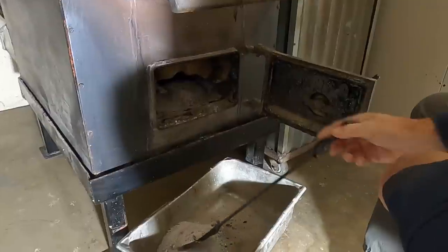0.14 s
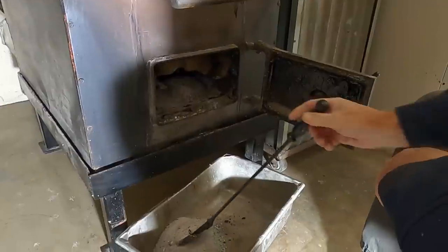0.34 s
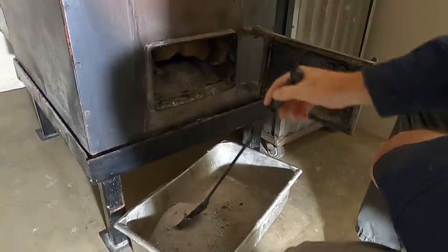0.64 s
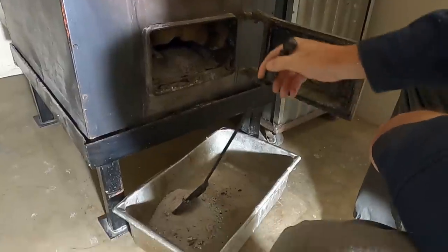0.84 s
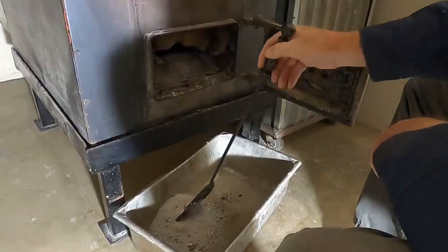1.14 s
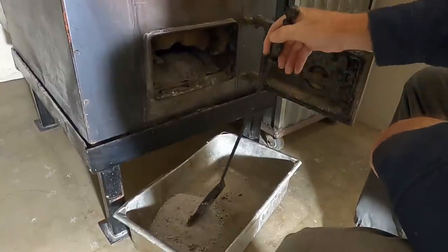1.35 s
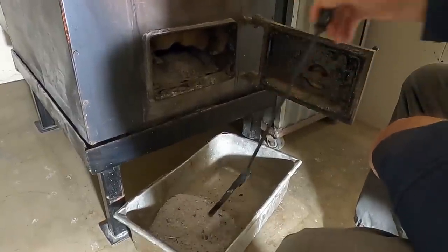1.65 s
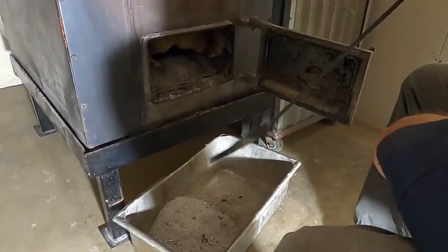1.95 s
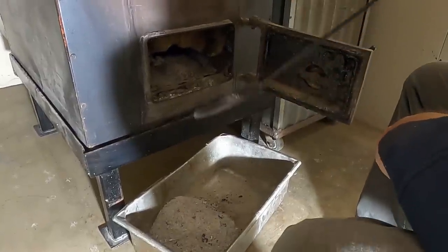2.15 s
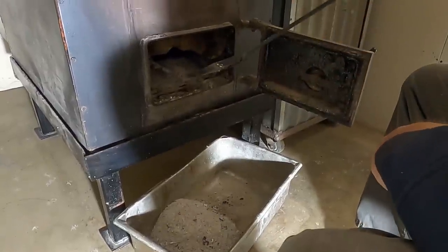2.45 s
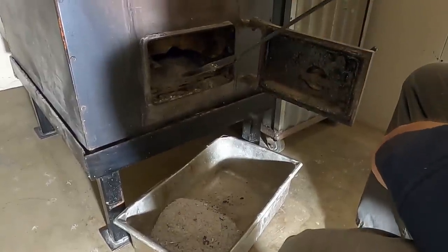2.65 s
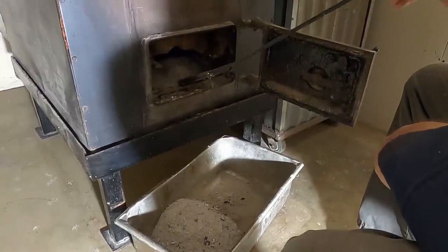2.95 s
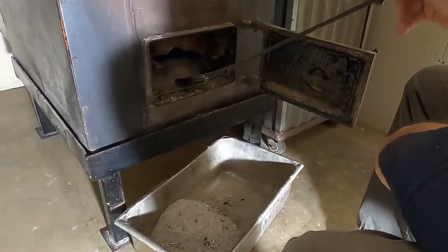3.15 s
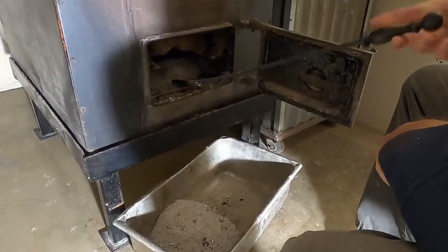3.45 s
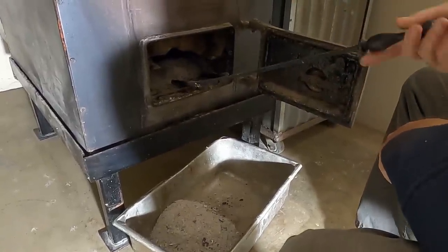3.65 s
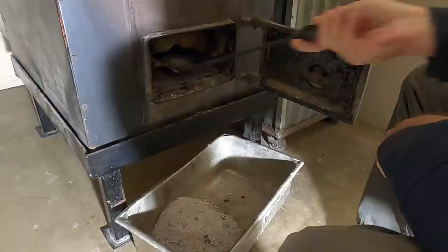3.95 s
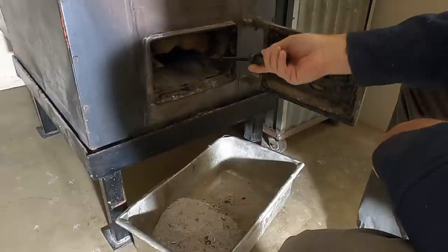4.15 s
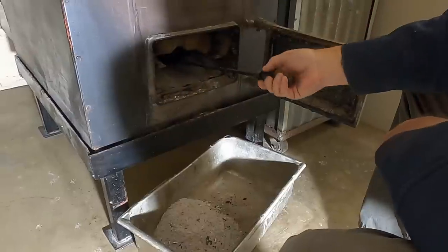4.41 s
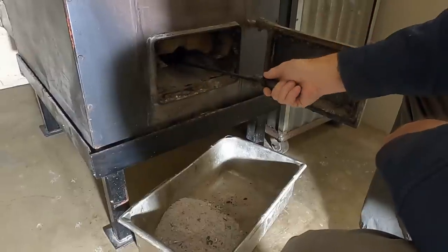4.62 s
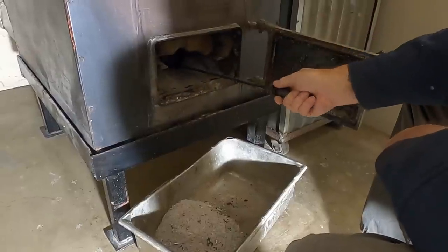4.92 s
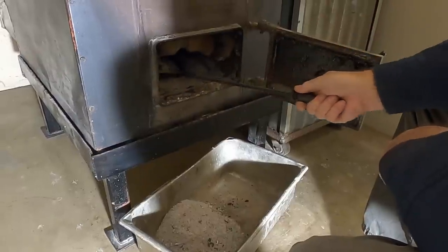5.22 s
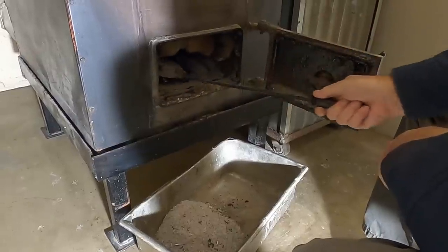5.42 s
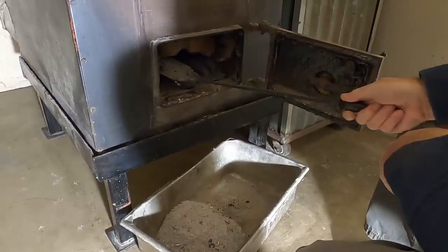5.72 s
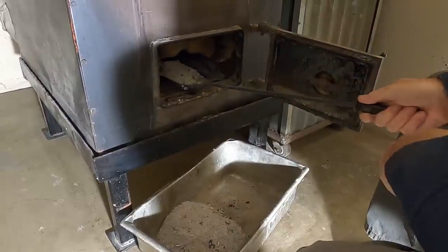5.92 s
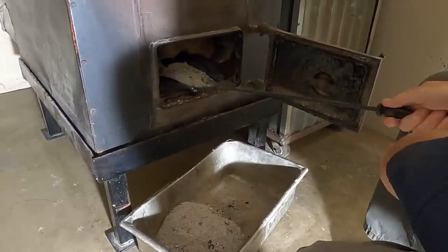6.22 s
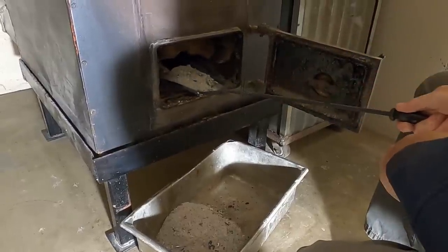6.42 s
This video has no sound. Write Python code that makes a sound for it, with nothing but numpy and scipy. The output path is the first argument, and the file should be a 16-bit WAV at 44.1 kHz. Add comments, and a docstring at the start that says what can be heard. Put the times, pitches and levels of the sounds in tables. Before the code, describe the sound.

Ash hisses softly off a small steel shovel, then the blade clanks on a stove door and scrapes gritty metal inside over a steady low fan hum.

```python
"""A small steel shovel lets its ash slide off into a metal tub, knocks against the ash door of a wood stove
and is pushed across the gritty steel floor, which rings under it. Loaded, it is drawn out with a soft rustle.
Scrape, ash, cinders, cloth and fan air are shaped grains or noise; squeaks, ringing steel and the fan's hum
are wavering sines. The fan hums all the while in the hard-walled room."""
import sys
import numpy as np
from scipy import signal
from scipy.fft import rfft, irfft, next_fast_len
from scipy.io import wavfile

SR = 44100
rng = np.random.default_rng(int(sys.argv[2]) if len(sys.argv) > 2 else 0)


def store_pcm(level_fs):
    """Save levels as 16-bit WAV."""
    pcm = np.round(np.clip(level_fs, -1, 1) * 32767).astype(np.int16)
    wavfile.write(sys.argv[1], SR, np.atleast_2d(pcm).T)


N = 289781
TIME = np.arange(N) / SR

# strokes of the blade over the stove floor: start t/s, speeding up/s, steady/s, slowing down/s,
# relative level/dB, treble control and low-ring control (both scaled to dB in scrape), chatter/0-1
FLOOR_STROKES = [(2.997, 0.021, 0.052, 0.032, -41, -24, -5, 1),
                 (3.06, 0.042, 0.2, 0.094, -40.5, -14, 3.5, 0.06),
                 (3.32, 0.063, 0.78, .1, -64.5, 10.5, 1, 0), (3.44, 0.063, 0.05, 0.092, -61, 6, -10, 0.1),
                 (3.802, 0.25, 0.093, 0.18, -21, -12.5, -5.5, 0.93),
                 (4.275, 0.042, 0.0085, 0.14, -42, -16, -10, 0.8),
                 (4.46, 0.058, 0.0094, 0.19, -63.5, -1, -4, 0)]
# colour of blade on grit: f/Hz, relative level/dB
GRIT_SPECTRUM = [(70, -39.5), (270, 0.5), (450, -5), (560, -12), (680, -9), (830, -14), (1000, -3.5),
                 (1700, -3), (3900, -5), (5600, -9), (7500, -11.5), (8700, -17), (13000, -25),
                 (15700, -36.5)]


def from_db(db):
    """Decibels to an amplitude factor."""
    return 10 ** (np.asarray(db) / 20)


def rms_one(x):
    """Scale to rms 1."""
    return x / np.sqrt(np.mean(x ** 2) + 1e-20)


def unit_energy(x):
    """Scale so that the channels have energy 1 on average."""
    return x / np.sqrt(np.mean(np.sum(x ** 2, axis=-1)))


def at_hz(points, size):
    """A table over log frequency, read at the bins of a transform."""
    hz, value = np.transpose(points)
    bins = np.fft.rfftfreq(size, 1 / SR)
    return np.interp(np.log(bins + 1e-3), np.log(hz), value)


def cut(x, hz, kind, order=2):
    """Butterworth filter."""
    sos = signal.butter(order, np.minimum(hz, .45 * SR), kind, fs=SR, output="sos")
    return signal.sosfilt(sos, x)


def colour(x, spectrum):
    """Causal (minimum-phase) filter with the given spectrum."""
    size = next_fast_len(x.shape[-1] + 4096, True)
    cepstrum = irfft(np.log(from_db(at_hz(spectrum, size))), size)
    # folding the cepstrum onto positive time makes the phase minimal
    cepstrum[1:size // 2] *= 2
    cepstrum[size // 2 + 1:] = 0
    response = np.exp(rfft(cepstrum))
    return irfft(rfft(x, size) * response, size)[..., :x.shape[-1]]


def stereo_noise(size):
    """Noise whose left-right likeness depends on frequency: strong in the bass, weak in the mid treble."""
    # f/Hz, left-right likeness/0-1
    likeness = [(30, 0.85), (200, 1), (600, 0.92), (1200, 0.72), (2500, 0.26), (5000, 0.21), (14000, 0.72)]
    padded = next_fast_len(size, True)
    mid, side = rfft(rng.standard_normal((2, padded)))
    alike = np.clip(at_hz(likeness, padded), 0, .999)
    both = np.sqrt(1 + alike) * mid + np.sqrt(1 - alike) * side * [[1], [-1]]
    return rms_one(irfft(both, padded)[:, :size])


def drift(rate):
    """Random curve of rms 1: straight lines between chance values, rate of them per second."""
    knots = rng.standard_normal(4000)
    return rms_one(np.interp(TIME * rate, np.arange(len(knots)), knots))


def partial(hz, waver_hz, rate):
    """A sine of height 1 whose pitch wavers at random."""
    pitch = hz + waver_hz * drift(rate=rate)
    return np.sin(2 * np.pi * (np.cumsum(pitch) / SR + rng.random()))


def resonance(x, hz, width_hz):
    """Two-pole band-pass with a gain of about 1 on top."""
    r = np.exp(-np.pi * width_hz / SR)
    feedback = [1, -2 * r * np.cos(2 * np.pi * hz / SR), r * r]
    return signal.lfilter([(1 - r * r) / 2, 0, (r * r - 1) / 2], feedback, x + 1e-18)


def steel(x, modes, width_at_1khz, lift_db):
    """A steel part lifts the sound at each of its modes; high modes are wider."""
    lifted = x
    for hz, db in modes:
        width_hz = width_at_1khz * np.sqrt(hz / 1000)
        lifted = lifted + (from_db(db + lift_db) - 1) * resonance(x, hz, width_hz)
    return lifted


def grains(per_s, spread_db):
    """Random clicks of unequal size and either sign, rms 1."""
    sizes = from_db(spread_db * np.minimum(rng.exponential(1, N), 5)) * rng.choice([-1, 1], N)
    return rms_one(sizes * (rng.random(N) < per_s / SR))


def room(x, wet_db, t60, above_hz):
    """Direct sound and a dense half-second tail, thin in the bass; the treble dies first."""
    t = TIME[:SR // 2]
    noise = cut(stereo_noise(len(t)), above_hz, "high", order=1)
    dull = cut(noise, 4600, "low", order=1)
    bright = noise - dull
    tail = dull * from_db(-60 * t / t60) + bright * from_db(-60 * t / (0.27 * t60))
    tail = tail * (t > .002)
    wet = signal.fftconvolve(np.atleast_2d(x), unit_energy(tail), axes=1)[:, :N]
    return (x + from_db(wet_db) * wet) / np.sqrt(1 + from_db(2 * wet_db))


def fan():
    """A wavering blade tone over rushing air that resonates in the housing."""
    # rushing air, then its hiss: f/Hz, relative level/dB
    air_spectrum = [(25, -49.5), (58, -26.5), (85, -28.5), (110, -20), (135, -23), (175, -13), (235, -4),
                    (290, -10.5), (450, -23.5), (640, -27), (900, -33.5), (1130, -29.5), (1500, -37.5),
                    (2400, -48.5)]
    hiss_spectrum = [(1500, -2.5), (2600, -12.5), (4800, 3), (7000, -2), (9000, -16), (15000, -23)]
    # resonances of the housing: f/Hz, width/Hz, rms level/dB
    housing_modes = [(204.45, 8.2, -46.5), (224.2, 19, -50.5), (266.4, 10.2, -52), (292.5, 7.9, -64),
                     (348.2, 22, -57.5), (453.3, 11.8, -59.5)]
    hum_hz, hum_db, sag_db_per_s = 195.7, -39.5, 0.4   # the tone sinks slowly

    level = from_db(hum_db - sag_db_per_s * TIME)
    pitch = hum_hz + 1.8 * drift(rate=12)
    flutter = from_db(2 * drift(rate=14) + 1.6 * drift(rate=28))
    tone = level * rms_one(flutter * np.sin(2 * np.pi * np.cumsum(pitch) / SR))
    air = from_db(-45.5) * rms_one(cut(colour(stereo_noise(N), air_spectrum), 2637, "low"))
    flow = stereo_noise(N)
    housing = 0
    for hz, width, db in housing_modes:
        mode = resonance(resonance(flow, hz, 1.34 * width), hz, 4 * width)
        housing = housing + from_db(db) * rms_one(mode)
    hiss = from_db(-79) * rms_one(colour(stereo_noise(N), hiss_spectrum))
    return tone + air + housing + hiss


def sleeve():
    """Cloth fibres rub faintly; each movement of the arm swells and fades like a bell curve."""
    # arm movements: middle t/s, length/s, relative level/dB
    movements = [(2.04, 0.17, -74), (4.827, 0.12, -73), (5.427, 0.49, -70.5), (5.74, 0.13, -74.5),
                 (6.243, 1, -75)]
    # rubbing cloth: f/Hz, relative level/dB
    cloth_spectrum = [(1290, -25.5), (2200, -4), (4500, -6), (7640, -12), (14000, -34)]
    power = sum(from_db(2 * db) * np.exp(-(2 * (TIME - s) / length) ** 2) for s, length, db in movements)
    rubbing = stereo_noise(N) * from_db(1.1 * drift(rate=160))
    return from_db(0.5) * np.sqrt(power) * rms_one(colour(rubbing, cloth_spectrum))


def cinders():
    """A cinder gives a bright tick as it cracks or drops; a heavy one also thuds on the steel under it."""
    # t/s, relative level of the bright tick/dB, relative level of the dull thud/dB
    drops = [(.632, -65, -62), (1.119, -54, -50), (3.84, -43, -39), (4.3894, -45.5, -56), (4.414, -54, -45),
             (4.529, -53.5, -55), (4.8562, -70, -44), (5.9894, -56, -74), (6.317, -58, -71)]
    out, t = np.zeros(N), TIME[:SR // 8]
    for s, tick_db, thud_db in drops:
        crack = rng.standard_normal(len(t))
        tick = cut(crack, [4500, 9500], "band") * np.exp(-t / 0.003)
        thud = cut(cut(crack, [560, 1700], "band"), 1900, "low") * np.exp(-t / 0.015)
        start = round(s * SR)
        out[start:start + len(t)] += from_db(tick_db) * tick + from_db(thud_db) * thud
    return from_db(4.5) * room(out, wet_db=-2.5, t60=0.209, above_hz=890)


def ash_flow():
    """Each slide builds up and runs out exponentially; overlapping slides add in power."""
    # slides of ash off the blade: peak t/s, relative level/dB, build-up/s, run-out/s
    ash_slides = [(0.017, -62.5, 0.096, 0.043), (0.2, -67.5, 0.091, 0.065), (0.495, -54, 0.027, 0.023),
                  (0.51, -55.5, 0.1, 0.049), (0.72, -71.5, 0.42, 0.21), (0.9, -65.5, 0.05, 0.36),
                  (1.14, -60, 0.089, 0.074), (1.475, -58.5, 0.21, 0.066), (1.54, -60, 0.049, 0.089)]
    power = 1e-18
    for s, db, build, run_out in ash_slides:
        away = np.maximum((s - TIME) / build, (TIME - s) / run_out)
        power = power + (from_db(db) * np.exp(-away)) ** 2
    return np.sqrt(power)


def blade_ring(drive):
    """Sliding ash feeds the modes of the freely held blade, which ring on after it has gone."""
    # f/Hz, relative level/dB
    modes = [(2516, -2), (3073, -6), (3520, -4), (4027, -1), (4310, -2), (4403, -1), (4920, -4),
             (5150, -3.5), (5420, -1), (5706, -7), (5997, -6), (6340, -2), (7332, -9)]
    t60_at_4khz = .26   # seconds; lower modes last longer
    out = 0
    for hz, db in modes:
        keep = from_db(-120 * (hz / 4000) ** 2 / (t60_at_4khz * SR))   # energy kept per sample
        energy = signal.lfilter([1 - keep], [1, -keep], drive ** 2 + 1e-18)
        shimmer = from_db(3.5 * drift(rate=30)) * partial(hz, waver_hz=7, rate=60)
        out = out + from_db(db) * np.sqrt(energy / energy.max()) * rms_one(shimmer)
    return from_db(-67.5) * room(out, wet_db=-5, t60=0.17, above_hz=1600)


def pour():
    """Fine ash hisses along the ringing blade; lumps land softly in the tub."""
    # fine ash: f/Hz, relative level/dB
    ash_spectrum = [(1180, -26.5), (2000, -17.5), (2110, -4), (5280, -0.5), (7800, -7.5), (12700, -16.5),
                    (15600, -30)]
    level = ash_flow()
    # the lumps go first, the fine ash last: level against the fine ash, falling at 14 dB/s from 0.34 s
    lumps_db = 5.5 - 14 * np.maximum(TIME - 0.34, 0)
    fine = rms_one(colour(grains(per_s=8200, spread_db=2.0), ash_spectrum))
    lumps = rms_one(cut(grains(per_s=900, spread_db=2.2), [880, 3200], "band"))
    # the emptier the blade, the more freely it rings, until it is lifted away
    empty = np.interp(TIME, [1.25, 1.54, 1.62], [.05, 1, 0])
    ash = room(level * (fine + from_db(lumps_db) * lumps), wet_db=-5.5, t60=0.25, above_hz=410)
    return ash + blade_ring(level * empty)


def knocks():
    """Each knock is a rough clank and adds energy to the shovel's modes, choked when the blade is pressed down."""
    # blade on steel: t/s, relative peak level/dB, pressure on the blade/0-1, brightness/dB per octave
    blows = [(1.119, -45, .6, 1), (2.9123, -36, 0, 2), (2.9163, -29.3, 0, 1), (2.9404, -29.5, 0, -3),
             (3.0165, -32.5, 0, 3), (3.0374, -31.5, 0, -1), (3.1076, -32, .8, -2), (3.16, -34, .9, -2),
             (3.2637, -38, .9, -2), (3.313, -37, .9, 0), (3.9844, -23, .9, -1), (4.0684, -18.5, .5, 0),
             (4.3315, -23.5, 1, -1)]
    # modes of the struck shovel and door frame: f/Hz, relative level/dB, t60/s
    modes = [(1628, 1.5, .14), (1911, -12, .22), (2385, -12, .35), (2485, -10, .35), (3330, -9.5, .4),
             (3543, -11, .35), (3866, -4, .35), (4021, -1.5, .4), (4380, -12, .22), (4530, -10, .16),
             (4890, -9, .2), (4982, -4.5, .18), (5130, -8.5, .2), (5735, -7.5, .17), (7080, -16, .12),
             (7680, -13, .12)]
    # a knock rings less under full pressure, and dies faster while pressed or once the next stroke begins
    pressed_loss_db, choke_db_per_s = 10, 260

    t, (hz, db, t60) = TIME[:SR // 2], np.transpose(modes)[:, :, None]
    clanks, energy = np.zeros(N), np.zeros((len(hz), N))
    for s, peak_db, pressure, bright_db in blows:
        attack = np.minimum(t / 0.00085, 1)
        blow = from_db(peak_db) * np.exp(-np.clip(pressure, 0, 1) * t / 0.012) * attack
        next_stroke = min(start for start, *_ in FLOOR_STROKES if start > s)
        choked_s = np.maximum(s + t - next_stroke, pressure * t)
        choke_db = pressed_loss_db * pressure + choke_db_per_s * choked_s
        span = slice(round(s * SR), round(s * SR) + len(t))
        mode_db = db + bright_db * np.log2(hz / 4000) - 60 * t / t60 - choke_db
        energy[:, span] += (blow * from_db(mode_db)) ** 2
        tilted = [(f, level + bright_db * np.log2(f)) for f, level in GRIT_SPECTRUM]
        clank = rms_one(colour(rng.standard_normal(len(t)), tilted))
        clanks[span] += blow * clank * np.exp(-t / 0.021)
    ring = sum(np.sqrt(e) * partial(f, waver_hz=8, rate=150) for f, e in zip(hz, energy))
    ring = room(ring, wet_db=-10, t60=0.21, above_hz=5000)
    return from_db(-14.0) * ring + from_db(-10.5) * room(clanks, wet_db=-3.0, t60=0.21, above_hz=5000)


def squeaks():
    """Where the edge catches, the steel sings roughly for a moment, at a pitch set by the point of contact."""
    # middle t/s, relative level/dB, f/Hz, length/s
    edge_squeaks = [(1.4, -65, 5200, .06), (3.056, -56, 7700, .045), (3.115, -44, 1238, .03),
                    (3.118, -47, 2380, .04), (3.21, -49, 1700, .03), (3.55, -65, 4080, .06),
                    (3.908, -40, 1680, .05), (3.975, -31, 1620, .04), (3.994, -31, 3250, .025),
                    (4.175, -28, 2945, .03), (4.345, -42, 2770, .035), (4.34, -43, 3300, .03)]
    out = 0
    for s, db, hz, length in edge_squeaks:
        swell = from_db(db) * np.exp(-2 * ((TIME - s) / length) ** 2)
        waver_hz = .028 * np.sqrt(hz * 4000)   # low squeaks jitter by a larger share of their pitch
        out = out + swell * rms_one(partial(hz, waver_hz=waver_hz, rate=700))
    return from_db(-1) * room(out, wet_db=-5, t60=0.202, above_hz=4800)


def catches(count=30):
    """Coarse grains snag under the edge; each rings briefly at a pitch set by its point of contact. Rms 1."""
    snags, dealt = grains(per_s=300, spread_db=0.5), rng.integers(0, count, N)
    pitches = np.geomspace(1500, 8000, count)
    return rms_one(sum(resonance(snags * (dealt == k), hz, width_hz=50) for k, hz in enumerate(pitches)))


def stroke_controls():
    """Loudness follows the blade's speed; along each stroke force sags, grit brightens and chatter sets in."""
    speed_power = 2.15   # loudness rises with this power of the blade's speed
    sag_db_per_s = 36   # a stroke loses force as ash heaps up before the blade
    brighten_per_s = 15   # treble control: the grit is ground finer along a stroke
    unload_per_s = 3   # low-ring control: the low ring of the plate fades along a stroke

    power, tone = 1e-18, 0
    for start, rise, steady, fall, db, treble, low, chatter in FLOOR_STROKES:
        length = rise + steady + fall
        age = np.clip(TIME - start, 0, length)
        speed = np.sin(np.pi / 2 * np.clip(np.minimum(age / rise, (length - age) / fall), 0, 1))
        force = from_db(db - sag_db_per_s * np.maximum(age - rise, 0))
        own = (speed ** speed_power * force) ** 2
        power = power + own
        # where strokes overlap, the louder one sets the tone
        eased = np.clip(chatter, 0, 1) * age / length
        starting = np.maximum(1 - age / rise, 0)
        tone = tone + own * np.array([treble + brighten_per_s * age, low - unload_per_s * age,
                                      eased, starting])
    return np.sqrt(power), *(tone / power)


def scrape():
    """The blade crushes grit in uneven slips; the grains set the stove floor ringing."""
    # modes of the stove floor: f/Hz, lift/dB (before the extra lift that all share)
    floor_modes = [(662, 7), (928, 6), (1033, 4.0), (1135, 6.4), (1251, 5.4), (1380, 3.9), (1598, 5.2),
                   (1703, 4.8), (1846, 3.2), (1919, 3.1), (2231, 3.0), (2395, 3.7), (2635, 2.8),
                   (2772, 5.4), (2855, 3.5), (3259, 3.0), (3986, 5.4), (4543, 2), (4990, 3), (6325, 4.0),
                   (7345, 4.4)]
    # chatter of the lightly held blade: f/Hz, width/Hz, relative level/dB
    chatter_modes = [(2660, 240, -2), (3750, 480, 7)]

    level, treble, low, eased, starting = stroke_controls()
    slips = from_db(1.4 * drift(rate=130))
    # grains break all across the width of the blade
    centre, edges = grains(per_s=8000, spread_db=3.0), grains(per_s=9000, spread_db=2.5)
    crush = rms_one((centre + from_db(-14.5) * edges * [[1], [-1]]) * slips)
    fine = rms_one(colour(crush, GRIT_SPECTRUM))
    coarse = rms_one(colour(catches(), GRIT_SPECTRUM))
    grit = rms_one(fine + from_db(-6) * coarse)
    # pressing hard drives the low ring of the plate; eased off, the blade chatters instead
    push = grit + cut(grit, 990, "low", order=1) * (from_db(0.68 * (low + 7.0)) - 1)
    push = push + eased * sum(from_db(db) * resonance(grit, hz, width) for hz, width, db in chatter_modes)
    push = cut(push, 6600, "low") - cut(grit, 8940, "high") * from_db(0.3 * (treble + 17.5))
    # the treble is weaker while the blade is still gathering speed
    push = push + cut(push, 3050, "high", order=1) * (from_db(-2.5 * starting) - 1)
    plate = steel(push * level, floor_modes, width_at_1khz=14, lift_db=3.6)
    # the heavy stove body takes up the lows late and booms on
    boom = room(cut(plate, [215, 540], "band"), wet_db=16, t60=.7, above_hz=10)
    return from_db(-4.5) * room(plate, wet_db=-10.0, t60=0.27, above_hz=4150) + from_db(-13) * boom


def scene():
    """The stove sounds lean slightly left in the mids and right in the top treble; the rest joins them."""
    # f/Hz, left minus right/dB
    stove_side = [(1000, 0.5), (2500, 1), (5000, -0.5), (9000, -1), (13000, -5)]
    left, right = scrape() + squeaks() + knocks() + cinders()
    stove = np.array([colour(left, [(hz, db / 2) for hz, db in stove_side]),
                      colour(right, [(hz, -db / 2) for hz, db in stove_side])])
    return stove + pour() + sleeve() + fan()


def record(dry):
    """The left microphone port lags in phase, most near 6 kHz; the top is cut steeply."""
    # f/Hz, phase lag of the left port/rad
    port_lag = [(500, 0.036), (3300, .5), (6000, 0.91), (6600, 0.032)]
    size = next_fast_len(N, True)
    left = irfft(rfft(dry[0], size) * np.exp(-1j * at_hz(port_lag, size)), size)[:N]
    steep = signal.ellip(12, .1, 90, 15550, fs=SR, output="sos")   # low-pass, cutoff in Hz
    return signal.sosfilt(steep, [left, dry[1]])


dry = scene()
out = record(dry)
store_pcm(out)
```